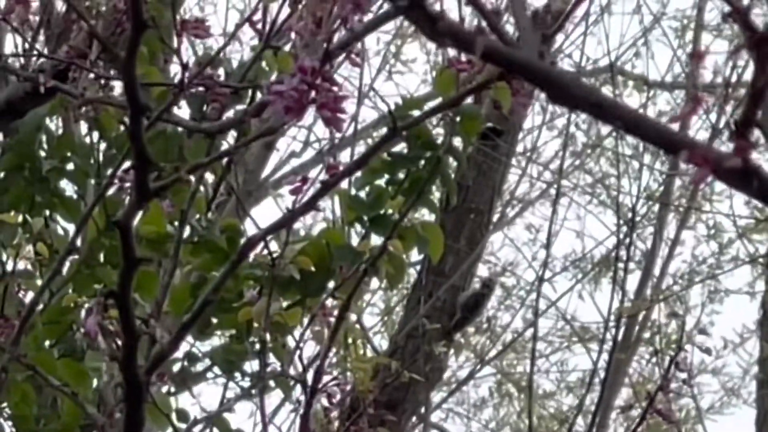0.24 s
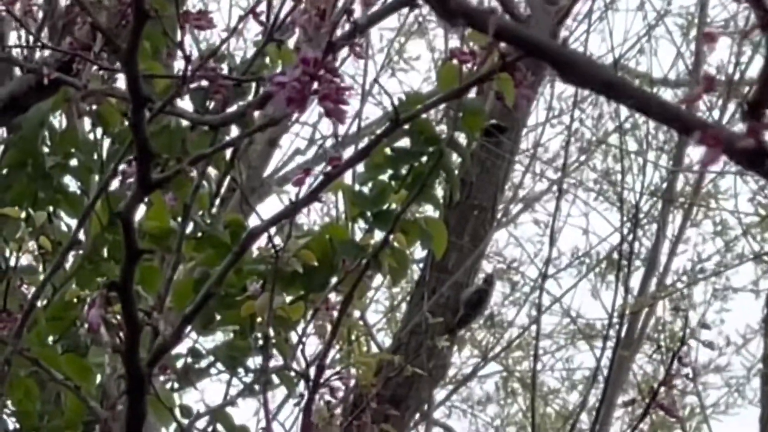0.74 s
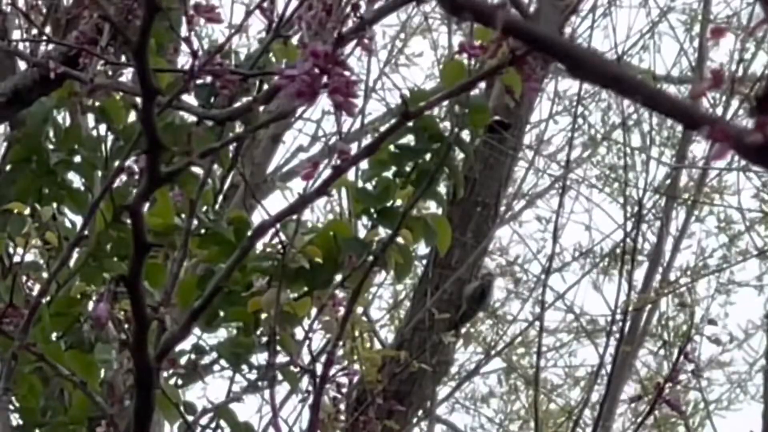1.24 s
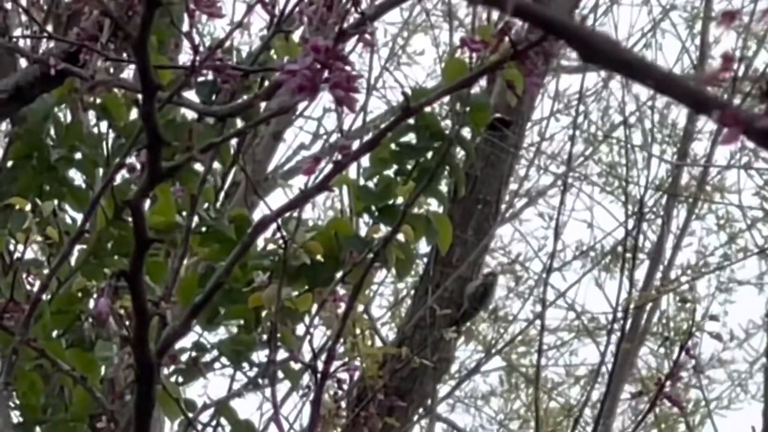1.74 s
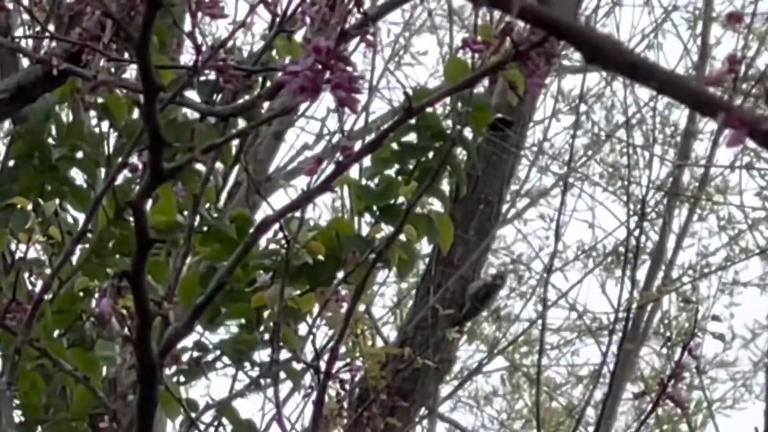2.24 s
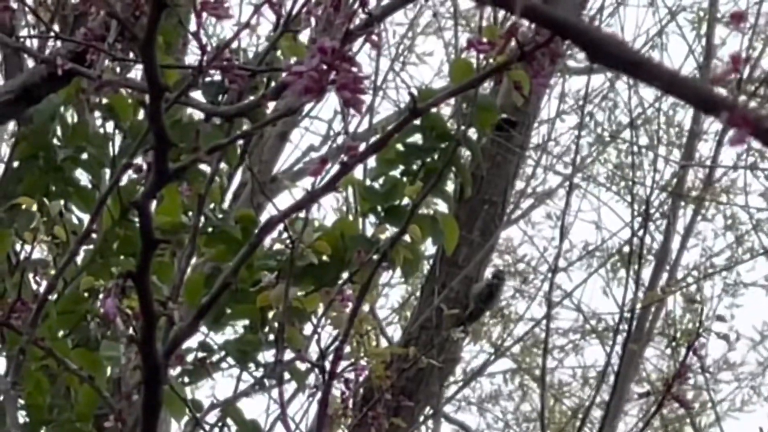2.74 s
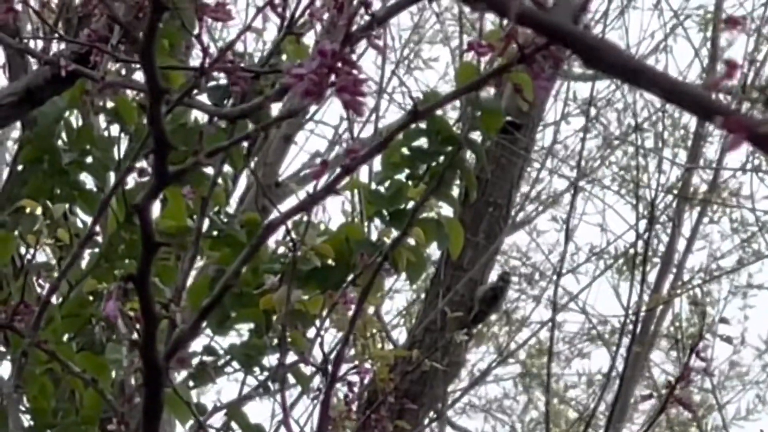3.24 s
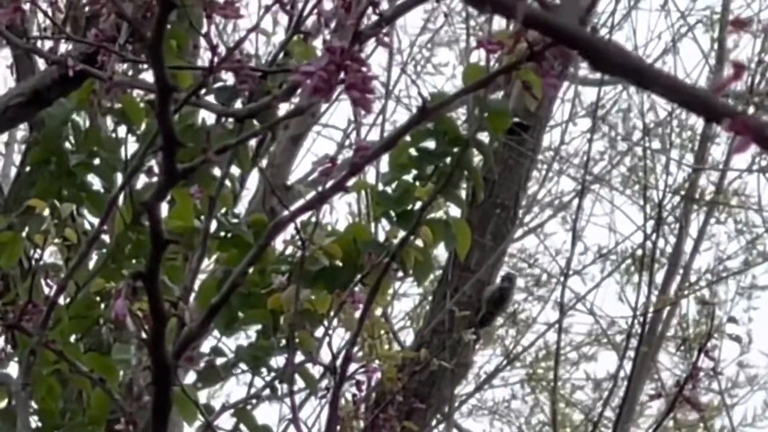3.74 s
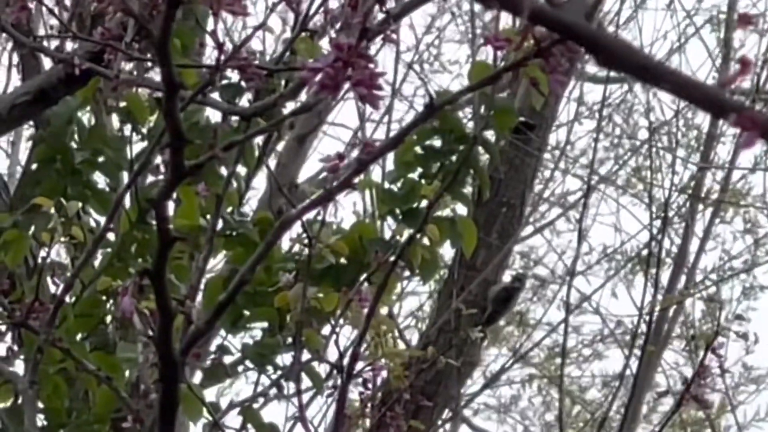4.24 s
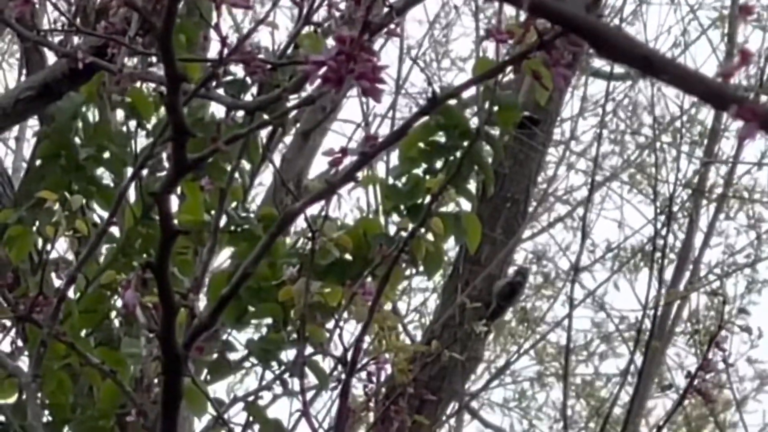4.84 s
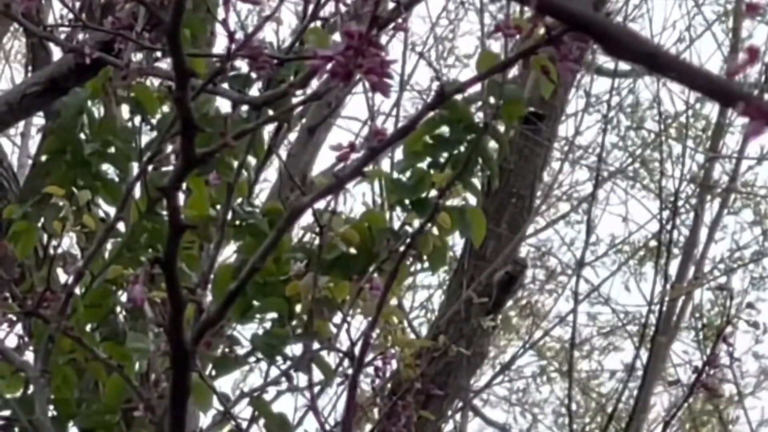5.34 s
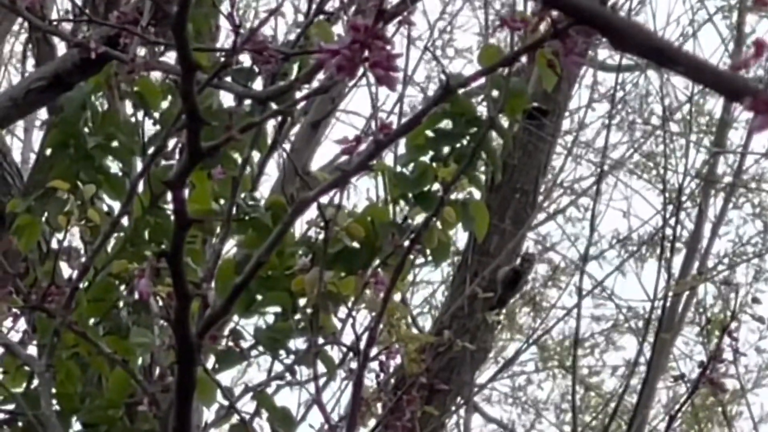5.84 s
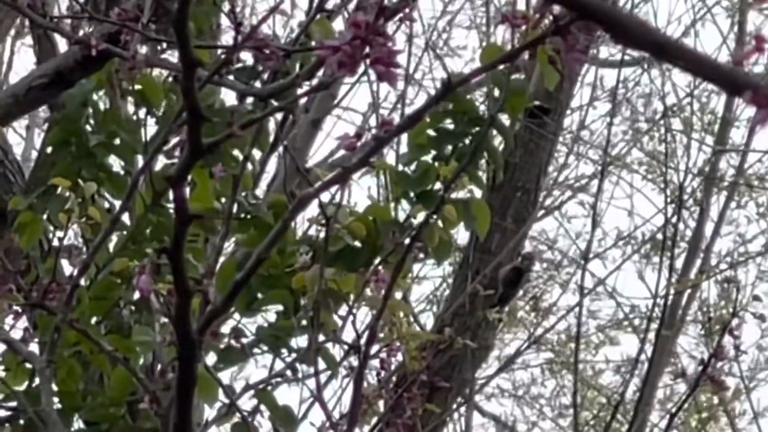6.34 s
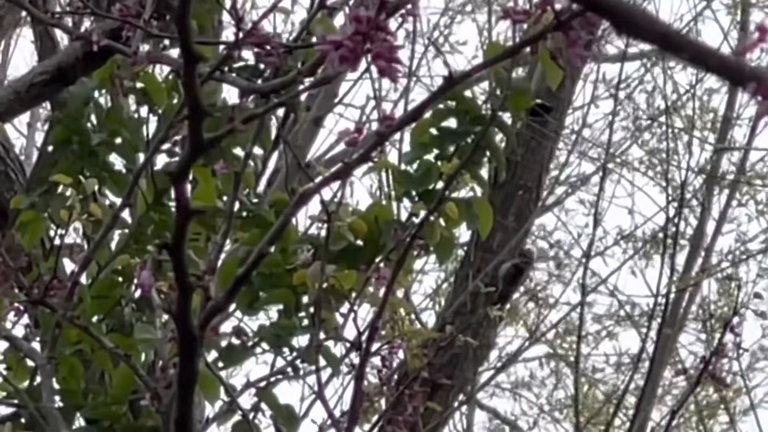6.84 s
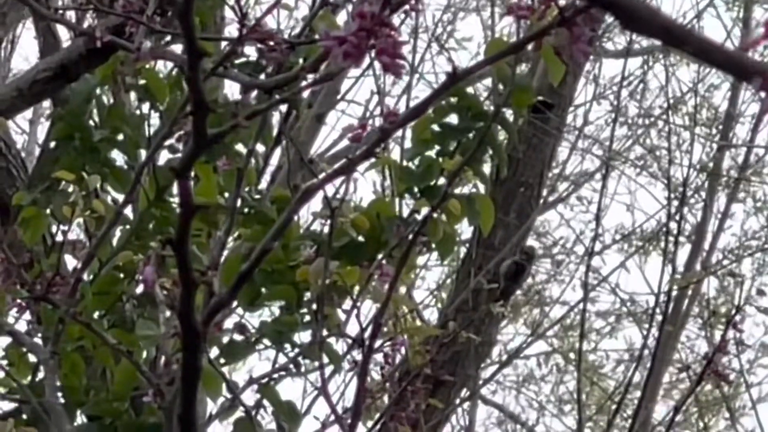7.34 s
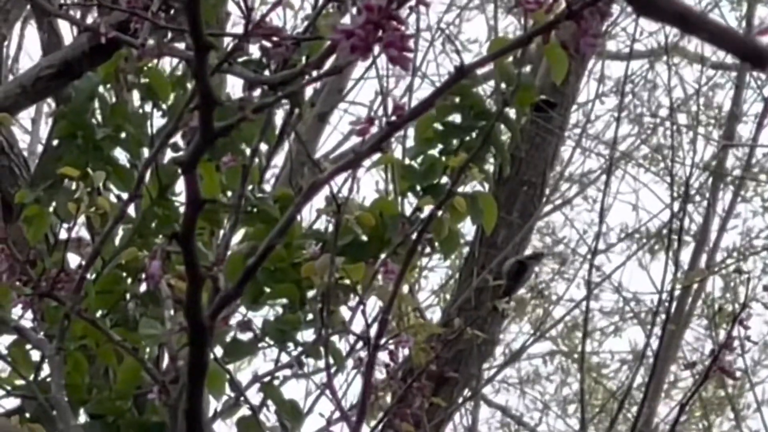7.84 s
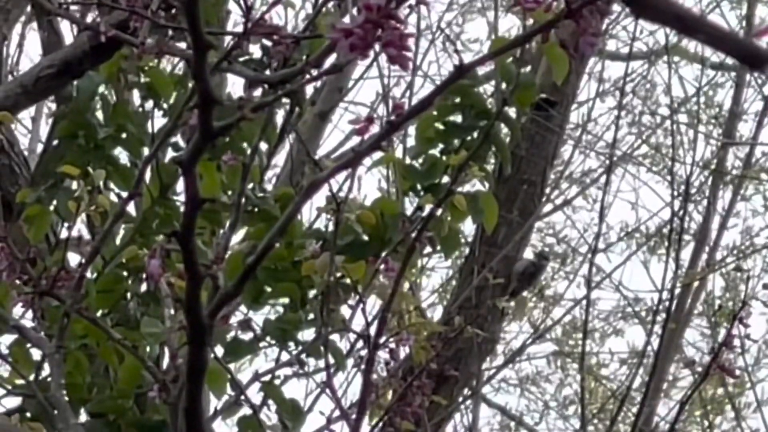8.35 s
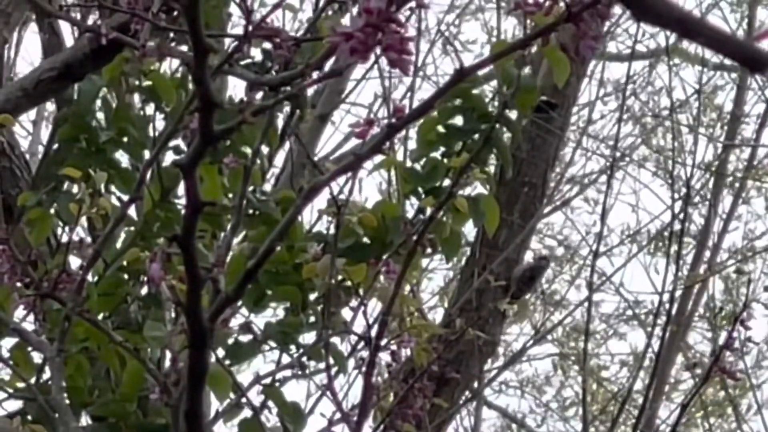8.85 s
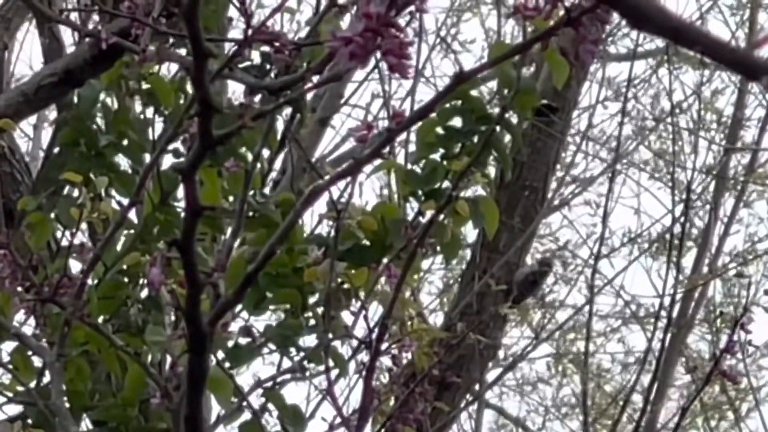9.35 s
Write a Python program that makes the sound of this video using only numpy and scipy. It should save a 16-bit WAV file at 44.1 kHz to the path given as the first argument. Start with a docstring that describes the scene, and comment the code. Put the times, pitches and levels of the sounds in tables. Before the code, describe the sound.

A handheld microphone under trees picks up a woodpecker at some distance: five rapid rolls of about eight to ten crisp, hollow or solid wooden knocks, slowing slightly. Between and beneath them songbirds buzz, whistle, rattle and trill, sparse at first and busier and louder later. Wind buffets the microphone in the first few seconds; distant traffic stays low and gradually fades.

```python
"""A soft wash of far traffic, a breeze rumbling on the microphone and a buzzing bird come first: shaped noise and FM.
Songbirds whistle, buzz, chatter and trill among the trees, as gliding near-pure tones with a weak octave.
A small woodpecker drums five rolls on two spots of a dead trunk: damped wood modes under a noisy crack of the beak.
Branches scatter the birds and drumming as decaying noise; nearby ticks, dull bumps and two faint tones complete it."""
import sys
import numpy as np
from scipy import signal
from scipy.fft import rfft, irfft
from scipy.io import wavfile
from scipy.ndimage import uniform_filter1d

SR = 44100
rng = np.random.default_rng(int(sys.argv[2]) if len(sys.argv) > 2 else 0)


def unload_audio(sound):
    """Save the sound as a 16-bit wav file, at the path given as the first command line argument."""
    columns = np.transpose(np.atleast_2d(sound))
    # keep every value between -1 and 1, then stretch to whole-number steps
    steps = np.round(np.clip(columns, -1, 1) * 32767)
    wavfile.write(sys.argv[1], SR, steps.astype(np.int16))


N = 423360
TIME = np.arange(N) / SR


def undb(db):
    """Level law: decibels to an amplitude ratio."""
    return 10 ** (np.asarray(db) / 20)


def unit(x):
    """Normalisation: scale to an rms of 1."""
    return x / np.sqrt(np.mean(x ** 2))


def colour(x, points):
    """Linear filtering: weight the spectrum by (f/Hz, level/dB) points, joined on a log-frequency axis."""
    hz, db = np.transpose(points)
    f = np.maximum(np.fft.rfftfreq(x.shape[-1], 1 / SR), 1)
    gain = undb(np.interp(np.log(f), np.log(hz), db))
    return irfft(rfft(x) * gain, x.shape[-1])


def noise(points, size):
    """Coloured noise: white noise through a spectral filter, at an rms of 1."""
    return unit(colour(rng.standard_normal(size), points))


def walk(rate):
    """Random modulation: held random values, about `rate` per second, smoothed and scaled to an rms of 1."""
    hold = int(SR / rate)
    steps = np.repeat(rng.standard_normal(N // hold + 1), hold)
    return unit(uniform_filter1d(steps, hold)[:N])


def add(track, s, sound):
    """Superposition: mix a sound into a track at time s, trimmed to the track."""
    i = int(round(s * SR))
    part = sound[max(-i, 0):max(N - i, 0)]
    track[max(i, 0):max(i, 0) + len(part)] += part


def stereo(mid, side):
    """Mid-side stereophony: the sum feeds the left, the difference the right."""
    return np.array([mid + side, mid - side])


def ears(x, lag_s, lean_db):
    """Interaural differences: the right channel arrives lag_s later, and the left is lean_db stronger."""
    left, right = x
    delay = np.exp(-2j * np.pi * np.fft.rfftfreq(N, 1 / SR) * lag_s)
    later = irfft(rfft(right) * delay, N)
    return np.array([left * undb(lean_db / 2), later * undb(-lean_db / 2)])


# Spectrum scattered by twigs and leaves: f/Hz, relative level/dB
SCATTER_SPECTRUM = [(300, -15), (1000, -6), (2000, -1), (4000, 3.5), (7000, 3.5), (12000, 5.5)]


def trees(x, wet_db, t60, width, build_s):
    """Diffuse scattering: convolve with noise that builds up after 4 ms, decays, and is nearly alike at both ears."""
    t = np.arange(SR) / SR
    decay = np.exp(-np.log(1000) * t / t60)
    envelope = decay * np.clip((t - .004) / build_s, 0, 1)
    mid, side = (noise(SCATTER_SPECTRUM, size=SR) * envelope / np.linalg.norm(envelope) for _ in range(2))
    response = stereo(mid, width * side)
    return undb(wet_db) * signal.fftconvolve(x[None], response, axes=1)[:, :N]


# Course of the far traffic: t/s, level/dB before a common offset
TRAFFIC_COURSE = [(0, -50.5), (1.9, -51.5), (3.2, -51.5), (4.3, -52), (5.1, -50.5), (6.1, -55.5),
                  (7.2, -55.5), (8.3, -55), (9.6, -59.5)]
# Spectrum of the far tyres: f/Hz, relative level/dB
TYRE_SPECTRUM = [(60, -9), (250, -0.5), (450, 2), (650, 3.5), (870, 8), (1150, -1.5), (1600, -6),
                 (2200, -10), (3000, -18.5), (4200, -29.5), (6000, -41), (9000, -36.5), (11500, -45),
                 (14000, -64)]


def traffic():
    """Incoherent sources: far tyres sum to a wide, gently wavering noise; the road lies to the left."""
    db = np.interp(TIME, *np.transpose(TRAFFIC_COURSE))
    mid, side = (noise(TYRE_SPECTRUM, size=N) * undb(db + 1.0 + 1.0 * walk(9)) for _ in range(2))
    side = colour(side, [(200, -4.5), (700, -11.5), (1100, 0.0), (2500, -9.5), (8000, -3.0)])
    return ears(stereo(mid, side), lag_s=4e-5, lean_db=2.5)


# Course of the breeze on the microphone: t/s, rumble level/dB and flutter level/dB, each before an offset
BREEZE_COURSE = [(0.0, -42, -52.5), (0.67, -41.5, -55.5), (0.85, -44.5, -59), (1.09, -35, -63),
                 (1.2, -45, -48), (1.31, -31, -48.5), (1.54, -30, -35.5), (1.6, -39.5, -50),
                 (1.72, -40, -35), (1.89, -57, -72), (2.16, -38, -38.5), (2.24, -51, -52),
                 (2.46, -38.5, -46), (2.56, -48.5, -50), (3.3, -49, -50.5), (3.7, -52.5, -55),
                 (4.37, -51.5, -57.5), (4.82, -48.5, -47.5), (6.4, -58.5, -61), (6.9, -52.5, -53),
                 (9.38, -50.5, -57.5), (9.57, -49.5, -56)]
# Spectrum of the low rumble: f/Hz, relative level/dB
RUMBLE_SPECTRUM = [(12, -26), (20, -40.5), (44, -2), (70, 3), (127, -2.5), (250, -20.5), (320, -75.5),
                   (550, -120)]
# Spectrum of the patchy flutter above it: f/Hz, relative level/dB
FLUTTER_SPECTRUM = [(90, -13.5), (170, 2), (280, -5.5), (420, -7), (700, -23.5), (1500, -61.5), (5000, -89)]
# Single eddies that thump the microphone: t/s of the centre, f/Hz, level/dB
EDDY_THUMPS = [(1.352, 151, -25), (1.429, 152, -22.5), (1.502, 116, -15.5), (1.532, 284, -20.5),
               (1.55, 132, -20), (1.587, 64.7, -23.5), (1.727, 303, -24.5), (1.795, 190, -33.5),
               (2.066, 180, -33), (2.142, 145, -33), (2.455, 157, -28.5), (2.899, 306, -34),
               (2.975, 180, -34), (3.024, 190, -35.5), (3.133, 216, -30.5), (3.277, 200, -35)]


def breeze():
    """Turbulent pressure: a rumble, a patchy flutter above it, and the strongest eddies as single pulses."""
    at, rumble_db, flutter_db = np.transpose(BREEZE_COURSE)
    gust = undb(np.interp(TIME, at, rumble_db) + 0.26)
    patchy = unit(noise(FLUTTER_SPECTRUM, size=N) * undb(3.9 * walk(60)))
    flutter = patchy * undb(np.interp(TIME, at, flutter_db) - 1.5)
    out = gust * noise(RUMBLE_SPECTRUM, size=N) + flutter
    for s, hz, db in EDDY_THUMPS:
        cycles = np.arange(-2, 2, hz / SR)
        pulse = np.sin(2 * np.pi * cycles) * np.exp(-(cycles / 0.57) ** 2)
        add(out, s - 2 / hz, -undb(db) * pulse)
    return stereo(out, 0.2 * gust * noise(RUMBLE_SPECTRUM, size=N))


# Faint far-off tones: mean f/Hz, mean level/dB at the start
HUM_TONES = [(413, -61), (520, -56)]
HUM_FADE_DB_PER_S = 4.5


def hum():
    """Slow amplitude and frequency modulation: two faint tones waver in the distance and fade."""
    out = 0
    for hz, db in HUM_TONES:
        loudness = undb(db - HUM_FADE_DB_PER_S * TIME + 2 * walk(7.4))
        phase = 2 * np.pi * np.cumsum(hz * (1 + 0.01005 * walk(12))) / SR
        out = out + loudness * np.sin(phase)
    return out


def songbirds():
    """Direct-to-scattered ratio: each group has its own scatter, and the farthest is half hidden in it."""
    waver = undb(2.0 * walk(150))
    buzz = buzzes()
    near = whistlers() * waver
    far = (chatter() + far_calls()) * waver
    run = trill() * waver + rattles()
    return (buzz + trees(buzz, wet_db=1.0, t60=0.28, width=0.33, build_s=.002)
            + near + trees(near, wet_db=-6.5, t60=0.35, width=0.24, build_s=.002)
            + 0.54 * far + trees(far, wet_db=-0.5, t60=0.38, width=.4, build_s=.002)
            + run + trees(run, wet_db=-4.5, t60=0.4, width=0.26, build_s=0.003))


def syrinx(hz, loudness, overtone_db):
    """Harmonic source: a near-pure tone, with an octave wherever its pitch is below 6 kHz."""
    phase = 2 * np.pi * np.cumsum(hz) / SR
    octave = undb(overtone_db) * (hz < 6000) * np.sin(2 * phase)
    return loudness * (np.sin(phase) + octave)


def note(length, pitches, edge):
    """Continuous glide: a polynomial in log pitch through evenly spaced points, with a tapered swell."""
    u = np.linspace(0, 1, int(length * SR))
    glide = np.polyfit(np.linspace(0, 1, len(pitches)), np.log(pitches), len(pitches) - 1)
    return np.exp(np.polyval(glide, u)), signal.windows.tukey(len(u), min(edge, 1))


# Buzzy notes: t/s, length/s, start f/Hz, middle f/Hz, end f/Hz, mean flutter rate/Hz, flutter depth/Hz, level/dB
BUZZY_NOTES = [(-.08, 0.31, 3400, 3260, 3140, 170, 420, -56), (-.02, .22, 4400, 4150, 3700, 170, 350, -66),
               (.16, 0.11, 3300, 3040, 2820, 170, 350, -57),
               (4.338, 0.039, 4300, 3600, 3200, 170, 150, -61),
               (4.52, .07, 6800, 7400, 7900, 164, 240, -74), (4.525, 0.05, 3330, 3800, 4080, 164, 121, -53),
               (4.944, 0.065, 6900, 8100, 8060, 193, 230, -60),
               (6.05, 0.35, 3460, 3256, 3115, 162, 268, -55),
               (6.412, 0.045, 6600, 7630, 7500, 198, 140, -64.5),
               (7.167, 0.105, 3700, 3650, 3650, 190, 240, -47)]


def buzzes():
    """Joint frequency and amplitude modulation: a fast, uneven flutter, loudest on each downstroke of pitch."""
    out, quaver = np.zeros(N), walk(250)
    for s, length, *pitches, rate, depth_hz, db in BUZZY_NOTES:
        hz, swell = note(length, pitches, edge=0.17)
        uneven = np.roll(quaver, -int(s * SR))[:len(hz)]
        beat = 2 * np.pi * np.cumsum(rate * (1 + 0.182 * uneven)) / SR
        downstroke = .56 - 0.36 * np.cos(beat)
        add(out, s, syrinx(hz + depth_hz * np.sin(beat), undb(db) * swell * downstroke, overtone_db=-34))
    return out


# Note shapes by name: interval/semitones from the note's pitch at its start, one third, two thirds and end
NOTE_SHAPES = {"dive": (6, 4, -0.4, -0.5), "slide": (5.5, 2, -3.5, -5), "fall": (3.5, 1.6, -0.6, -3.5),
               "ease": (7, 1, -1.1, -1.5), "sag": (2.5, 0.56, -0.47, -1.6),
               "droop": (-1.6, 0.56, -0.63, 0.077), "scoop": (2, 1.4, 0.4, -3),
               "dip": (2.6, 0.47, -0.24, -0.1), "hold": (-0.16, .1, 0.23, -0.16),
               "arch": (-1, -0.25, 0.2, -1.2), "peak": (-3.5, 0.3, -1.2, -8.5),
               "lift": (-0.78, -0.35, .2, 1.2), "rise": (-3, -0.5, .5, 3), "upsweep": (-1, -0.13, 0.8, 8),
               "glide": (2.5, 1.2, -0.95, -2), "chip": (4.5, 0.5, -0.5, -6)}
# Octave of a whistle, stronger at high pitch: f/Hz of the whistle, octave level/dB relative to it
OCTAVE_LEVEL = [(2750, -53), (3300, -36), (4200, -34), (4700, -22), (5600, -12.5)]


def whistle(length, pitch_hz, db, shape):
    """Frequency modulation: a shaped glide with a slight random quaver."""
    hz, swell = note(length, pitch_hz * 2 ** (np.array(NOTE_SHAPES[shape]) / 12), edge=0.39)
    quaver = noise([(200, 0), (600, -40)], size=len(hz))
    overtone_db = np.interp(hz, *np.transpose(OCTAVE_LEVEL))
    return syrinx(hz * (1 + 0.012 * quaver), undb(db) * swell, overtone_db=overtone_db)


# Stretches of faint chatter: start t/s, end t/s, lowest f/Hz, highest f/Hz, greatest level/dB of a note
CHATTER_SPANS = [(0, .5, 2495, 3700, -67), (2.852, 3.35, 2900, 3935, -68), (6.297, 8.2, 2270, 3700, -55.5),
                 (8.2, 9.5, 1976, 2914, -54)]
# The gentler shapes it draws on, by name
GENTLE_SHAPES = ("hold", "arch", "sag", "scoop", "rise")
CHATTER_GAP_S = .06  # one note in each gap, at a random moment


def chatter():
    """Random process: birds deeper in the wood sing the gentler shapes with chance timing, pitch and level."""
    out = np.zeros(N)
    for start, end, low_hz, high_hz, db in CHATTER_SPANS:
        chance = rng.random((int(N / SR / CHATTER_GAP_S), 5))
        for s, (late, span, pitch, size, pick) in zip(np.arange(start, end, CHATTER_GAP_S), chance):
            hz = low_hz * (high_hz / low_hz) ** pitch
            shape = GENTLE_SHAPES[int(pick * len(GENTLE_SHAPES))]
            add(out, s + late * CHATTER_GAP_S, whistle(0.02 + 0.04 * span, hz, db - 6 * size, shape))
    return out


# Single whistles of the warbling birds: t/s, length/s, f/Hz, level/dB, shape
SINGLE_WHISTLES = [(.24, 0.076, 2170, -62, "scoop"), (.294, 0.066, 5600, -66.5, "glide"),
                   (0.346, 0.057, 6550, -72.5, "glide"), (0.35, 0.065, 3300, -64, "glide"),
                   (0.542, 0.019, 3750, -66, "sag"), (0.694, 0.027, 8120, -59.5, "hold"),
                   (0.711, 0.047, 6640, -55, "ease"), (0.748, 0.039, 5660, -65, "sag"),
                   (0.787, 0.087, 3240, -60.5, "glide"), (.9, 0.056, 2390, -63, "lift"),
                   (2.042, 0.057, 4350, -65, "arch"), (2.058, 0.065, 3400, -51.5, "dip"),
                   (2.118, 0.035, 3900, -54, "peak"), (3.808, 0.054, 4180, -63, "arch"),
                   (3.822, 0.045, 3310, -54, "sag"), (3.86, 0.065, 8200, -68.5, "dip"),
                   (4.74, 0.034, 4800, -69, "lift"), (4.997, 0.032, 4680, -56, "lift"),
                   (5.628, 0.065, 4100, -58, "hold"), (5.944, 0.029, 4070, -55.5, "hold"),
                   (6.028, 0.042, 3900, -54, "fall"), (6.14, 0.057, 3920, -59, "arch"),
                   (6.227, 0.038, 4140, -55.5, "hold"), (6.336, 0.093, 3720, -54.5, "hold"),
                   (6.438, 0.053, 3180, -53, "dip"), (6.53, 0.065, 4020, -51, "dip"),
                   (6.597, 0.05, 3380, -49.5, "ease"), (6.67, 0.063, 2620, -51, "dip"),
                   (6.819, 0.034, 3070, -54, "ease"), (6.888, 0.045, 3500, -50.5, "hold"),
                   (6.952, 0.037, 2760, -47, "upsweep"), (6.965, 0.034, 2650, -52, "lift"),
                   (7.064, 0.034, 3480, -47.5, "lift"), (7.098, 0.045, 2280, -45.5, "fall"),
                   (7.137, 0.063, 2323, -47, "hold"), (7.24, 0.049, 2820, -47.5, "rise"),
                   (7.351, 0.033, 1790, -52.5, "lift"), (7.355, 0.037, 2930, -55, "ease"),
                   (7.389, 0.062, 2233, -46, "dip"), (7.409, 0.052, 3710, -51, "dip"),
                   (7.447, 0.049, 2320, -44.5, "dip"), (7.466, .03, 2980, -53.5, "rise"),
                   (7.545, 0.043, 2664, -42, "upsweep"), (7.607, 0.032, 4360, -57.5, "sag"),
                   (7.645, 0.044, 2640, -47.5, "slide"), (7.695, 0.067, 2090, -43.5, "sag"),
                   (7.71, 0.04, 2900, -53, "lift"), (7.756, 0.032, 4140, -53.5, "dip"),
                   (7.814, 0.065, 3260, -52, "fall"), (7.883, 0.042, 2687, -41.5, "upsweep"),
                   (7.967, 0.043, 2810, -50, "ease"), (8, 0.042, 1740, -49.5, "dip"),
                   (8.028, 0.028, 4070, -52, "dip"), (8.051, 0.026, 3430, -46.5, "peak"),
                   (8.054, 0.04, 2260, -44.5, "fall"), (8.105, 0.048, 2360, -45, "lift"),
                   (9.071, 0.051, 2010, -41.5, "lift"), (9.14, 0.034, 2560, -34.5, "arch"),
                   (9.191, 0.048, 2245, -45, "rise"), (9.363, 0.048, 2016, -43.5, "lift"),
                   (9.435, 0.025, 2750, -39.5, "sag"), (9.475, 0.049, 2344, -40, "rise")]
# Repeated phrases by name, note by note: delay t/s, length/s, f/Hz, level/dB relative to the song, shape
SONG_PHRASES = {"plunge": [(0, 0.022, 6220, 5, "dive"), (.017, .016, 5240, -2, "scoop"),
                (.034, .064, 3710, 4, "slide"), (.118, .047, 2192, 5, "droop")],
                "loop": [(0, .036, 2773, -1, "upsweep"), (.054, 0.027, 1920, -3, "fall"),
                (.103, 0.061, 1800, -10, "lift"), (.166, .058, 2220, -1.5, "sag"),
                (.22, 0.057, 2300, -4.5, "hold")]}
# When the phrases are sung: t/s, level/dB, phrase
SONG_TIMES = [(1.12, -53.5, "plunge"), (1.502, -45, "plunge"), (8.209, -40.5, "loop"),
              (8.612, -43.5, "loop")]


def whistlers():
    """Superposed tones: single whistles, and phrases repeated from a small stock."""
    out = np.zeros(N)
    for s, length, hz, db, shape in SINGLE_WHISTLES:
        add(out, s, whistle(length, hz, db, shape))
    for s, song_db, phrase in SONG_TIMES:
        for delay, length, hz, db, shape in SONG_PHRASES[phrase]:
            add(out, s + delay, whistle(length, hz, song_db + db, shape))
    return out


# Calls from deep in the wood, before their direct sound is weakened: t/s, length/s, f/Hz, level/dB, shape
DEEP_CALLS = [(.43, .085, 2710, -64, "glide"), (.79, 0.048, 6650, -82, "glide"),
              (2.975, .045, 4800, -74, "arch"), (3.035, .039, 3970, -68, "sag"),
              (3.12, .03, 3900, -64, "arch"), (3.222, 0.034, 3640, -65, "sag"),
              (3.34, 0.065, 6560, -82, "hold"), (3.528, 0.062, 6900, -78, "hold"),
              (3.975, 0.038, 4950, -72, "hold"), (4.305, .04, 4880, -72, "arch"),
              (4.643, .035, 4850, -67, "arch"), (4.693, 0.048, 4100, -64, "arch"),
              (5.799, .18, 6670, -71.5, "hold"), (6.35, 0.053, 2680, -58, "glide"),
              (7.485, .04, 2750, -52, "rise"), (7.595, .04, 5980, -75, "glide"),
              (8.065, .04, 3950, -65, "arch"), (8.182, .035, 4290, -71, "hold"),
              (8.341, 0.033, 2930, -61, "rise"), (9.057, 0.054, 6200, -74, "glide"),
              (9.138, 0.038, 4400, -68, "sag")]


def far_calls():
    """Distant tonal sources: single calls from deep in the wood, heard mostly as scatter."""
    out = np.zeros(N)
    for s, length, hz, db, shape in DEEP_CALLS:
        add(out, s, whistle(length, hz, db, shape))
    return out


# Spectrum of the beak's crack on bark: f/Hz, relative level/dB
CRACK_SPECTRUM = [(400, -23.5), (750, 0), (1500, 5), (2800, 2.5), (3400, 7), (3900, 4.5), (4400, -12.5),
                  (4900, -1), (5500, -7.5), (6800, -7), (9000, -6), (10200, -1.5), (11200, -15),
                  (13000, -46)]


def knock(modes, crack_db, crack_t60, pitch):
    """Modal impact: damped wood modes of alternating sign, randomly rebalanced, under a bright noisy crack."""
    t = np.arange(SR // 16) / SR
    balance = undb(1.5 * rng.standard_normal(len(modes)))
    wood = np.zeros(len(t))
    for k, (hz, db, t60) in enumerate(modes):
        ring = np.sin(2 * np.pi * hz * pitch * t) * np.exp(-np.log(1000) * t / t60)
        wood += (-1) ** k * undb(db) * balance[k] * ring
    crack = noise(CRACK_SPECTRUM, size=len(t)) * np.exp(-np.log(1000) * t / crack_t60)
    return wood + undb(crack_db) * crack


# Trunk modes at the hollow spot: nominal f/Hz, mean level/dB before the strike's strength, t60/s
HOLLOW_MODES = [(815, -44, 0.028), (983, -29.5, .031), (1330, -48.5, .018), (1344, -37, 0.0092),
                (1842, -28.5, 0.016), (2080, -38.5, 0.0054), (3930, -48.5, 0.016), (4934, -50, 0.038),
                (6720, -58, 0.027), (7890, -58.5, .018)]
# Trunk modes at the solid spot: nominal f/Hz, mean level/dB before the strike's strength, t60/s
SOLID_MODES = [(796, -40, 0.017), (990, -32, 0.025), (1170, -27.5, 0.012), (1683, -30, 0.013),
               (1934, -32, 0.034), (2160, -26.5, 0.0073), (2750, -34, 0.0056), (3360, -41.5, .01)]
# Beak strikes in five rolls that start more softly and slow down: t/s, relative level/dB
BEAK_STRIKES = [(1.2808, -5.0), (1.3139, -3.0), (1.3727, 0.0), (1.4321, -1.0), (1.4924, -1.0),
                (1.5542, -0.5), (1.6185, -1.5), (1.6806, -1.0), (1.7453, -1.5), (1.8104, -3.0),
                (2.2784, -2.5), (2.3365, -1.0), (2.3965, -1.5), (2.4596, -1.5), (2.5251, -2.0),
                (2.5895, -3.5), (2.6532, -2.5), (2.7163, -2.5), (5.226, -17.0), (5.2791, -6.5),
                (5.3354, -1.5), (5.3951, -1.0), (5.4562, 0.0), (5.5194, -0.5), (5.5833, -1.0),
                (5.6456, 0.0), (5.7131, -1.0), (6.7224, -5.5), (6.7813, -3.0), (6.8398, -2.5),
                (6.8984, -1.0), (6.96, -0.5), (7.0228, -2.0), (7.0855, 0.5), (7.1517, -0.5), (7.2167, 0.0),
                (7.284, -1.0), (8.656, -19.0), (8.709, -11.0), (8.766, -5.5), (8.8254, -4.5),
                (8.8871, -4.0), (8.9499, -5.0), (9.0146, -3.5), (9.091, -17.0)]
# Drumming falls on the solid spot in this span, otherwise on the hollow one: start t/s, end t/s
SOLID_TIMES = (5, 8)
# Upper limit of the drumming: f/Hz, gain level/dB
KNOCK_TOP_CUT = [(9000, -0.5), (11500, 2), (13000, -35), (16000, -45)]


def woodpecker():
    """Impact and reflection: rolls of knocks, each returned by a near surface about 4 ms later."""
    out = np.zeros(N)
    for s, db in BEAK_STRIKES:
        pitch = 1 + 0.0066 * rng.standard_normal()  # slight random detuning of each knock
        if SOLID_TIMES[0] < s < SOLID_TIMES[1]:
            blow = knock(SOLID_MODES, crack_db=-62.5, crack_t60=0.031, pitch=pitch)
        else:
            blow = knock(HOLLOW_MODES, crack_db=-45, crack_t60=0.029, pitch=pitch)
        add(out, s, undb(db) * blow)
    echo_s = .00394
    echo = 0.64 * np.interp(TIME - echo_s, TIME, out)
    out = colour(out + echo, KNOCK_TOP_CUT)
    return out + trees(out, wet_db=-5.5, t60=0.4, width=0.3, build_s=0.0092)


# Dry leaves and twigs that tick nearby: t/s, decay time constant/s, level/dB
LEAF_TICKS = [(1.288, 0.00044, -40), (4.37, 0.033, -66.5), (4.6, .02, -65)]
# Spectrum of a tick: f/Hz, relative level/dB
TICK_SPECTRUM = [(1000, -25), (4000, 1), (8000, 1), (11000, 9), (13000, -20), (15000, -24)]
# Faint dull bumps: t/s, length/s, centre f/Hz, level/dB
DULL_BUMPS = [(4.834, 0.032, 750, -41.5), (4.935, 0.069, 835, -46), (4.958, 0.0092, 780, -31.5)]


def small_sounds():
    """Transient noise: twigs and leaves tick close by as decaying bursts; something bumps dully farther off."""
    near, far = np.zeros(N), np.zeros(N)
    t = np.arange(SR // 10) / SR
    for s, decay, db in LEAF_TICKS:
        add(near, s, undb(db) * noise(TICK_SPECTRUM, size=len(t)) * np.exp(-t / decay))
    for s, length, hz, db in DULL_BUMPS:
        body = [(hz / 2, -30), (hz * .85, 0), (hz * 1.15, 0), (hz * 1.5, -30), (hz * 4, -100)]
        size = int(length * SR)
        add(far, s, undb(db) * noise(body, size=size) * np.hanning(size))
    return near + far + trees(far, wet_db=2, t60=0.96, width=.5, build_s=.002)


# Quick runs of chips: t/s, number of chips, first gap/s, gap added per chip/s, first f/Hz, f/Hz it settles towards,
# mean level/dB of the first chip, fade per chip/dB
CHIP_RUNS = [(4.775, 8, .0115, 0.00046, 4410, 3080, -57.5, 0.5),
             (5.02, 11, .0135, .0003, 4570, 3150, -54, -0.2)]
CHIP_S, CHIP_SINK_COUNT = .009, 2.0  # length of a chip; chips over which the pitch settles


def rattles():
    """Exponential relaxation: steeply falling chips of uneven force sink in pitch as their gaps lengthen."""
    out = np.zeros(N)
    for s, count, gap, slowing, first_hz, last_hz, db, fade_db in CHIP_RUNS:
        for k in range(round(count)):
            stray, force = rng.standard_normal(2)
            sinking_hz = last_hz + (first_hz - last_hz) * np.exp(-k / CHIP_SINK_COUNT)
            hz = sinking_hz * (1 + 0.017 * stray)
            at = s + k * gap + slowing * k * (k - 1) / 2
            add(out, at, whistle(CHIP_S, hz, db - fade_db * k + force, "chip"))
    return out


# Hooked notes of a trill: t/s, reference f/Hz, level/dB before the hook's own
TRILL_NOTES = [(5.247, 4900, -55.5), (5.324, 4690, -48.5), (5.408, 4640, -50), (5.488, 4790, -49.5),
               (5.57, 4640, -46.5), (5.662, 4855, -50.5), (5.744, 4460, -51), (5.833, 4700, -52)]
# Course of one hook: t/s after its start, share of the reference pitch, relative level/dB
HOOK_COURSE = [(0, 0.85, -55), (.02, 0.93, -10), (.035, 0.96, -2.5), (.047, 0.98, 5), (.053, .86, -1),
               (.062, 0.41, -1)]


def trill():
    """Pitch-dependent harmonics: in a run of hooked notes, the octave dies as each one plunges."""
    out = np.zeros(N)
    at, share, hook_db = np.transpose(HOOK_COURSE)
    t = np.arange(int(at[-1] * SR)) / SR
    bend = np.interp(t, at, share)
    octave_db = np.interp(bend, [.55, .95], [-30, 0]) - 10.0
    for s, hz, db in TRILL_NOTES:
        loudness = undb(db + np.interp(t, at, hook_db)) * signal.windows.tukey(len(t), .1)
        add(out, s, syrinx(hz * bend, loudness, overtone_db=octave_db))
    return out


# Sound from the trees ahead reaches two microphone ports out of step: f/Hz, phase/rad by which the left leads
PORT_PHASE = [(0, 2.5), (900, 0.12), (1890, 0.36), (3150, 0.52), (4700, 0.45), (6000, 0), (7000, -1.05),
              (8000, .5), (9000, -0.1), (9600, -3), (11600, -1.5)]


def ports(x):
    """Interchannel phase: the body around the two microphone ports shifts the right against the left."""
    shift = np.interp(np.fft.rfftfreq(N, 1 / SR), *np.transpose(PORT_PHASE))
    return np.array([x[0], irfft(rfft(x[1]) * np.exp(-1j * shift), N)])


def scene():
    """Linear superposition: the sources among the trees pass the ports, and the background joins them."""
    return traffic() + breeze() + hum() + ports(songbirds() + woodpecker() + small_sounds())


# Presence peak of the microphone: f/Hz, gain level/dB
PRESENCE = [(3000, 0.5), (4600, -1), (5500, 1), (6400, 3), (7300, 1), (9000, 1)]
TOP_HZ = 15900  # upper band limit


def record(dry):
    """Band limiting: the microphone adds a little presence, and a steep low-pass cuts the top."""
    low_pass = signal.ellip(8, .2, 70, TOP_HZ, fs=SR, output="sos")
    return signal.sosfilt(low_pass, colour(dry, PRESENCE))


dry = scene()
out = record(dry)
unload_audio(out)
```